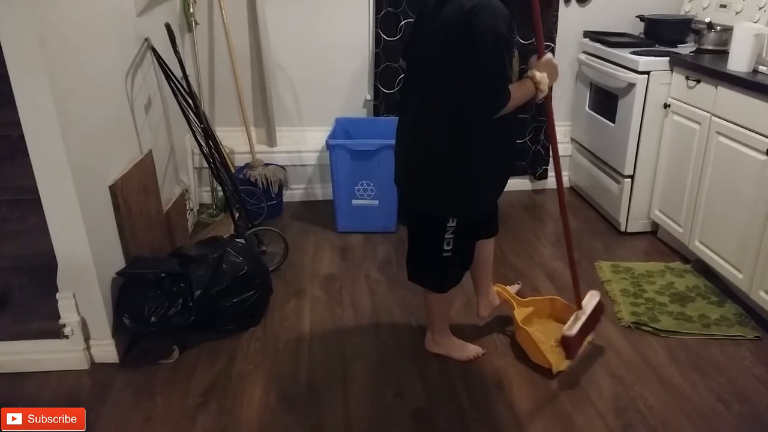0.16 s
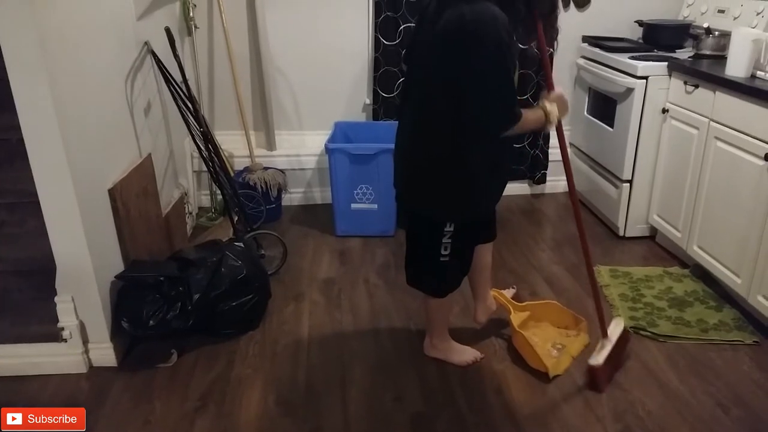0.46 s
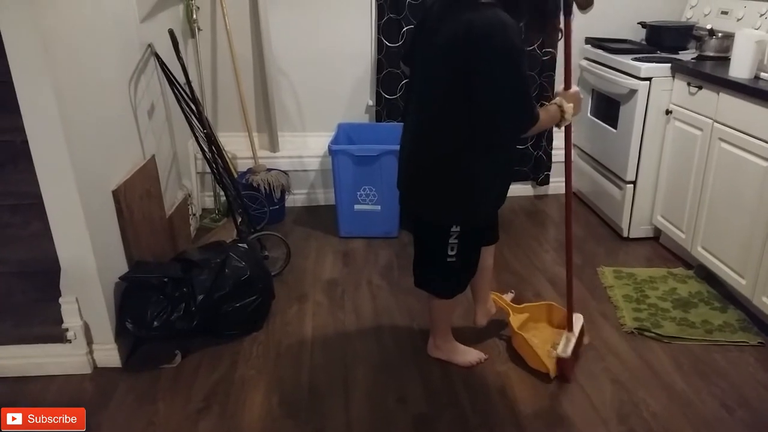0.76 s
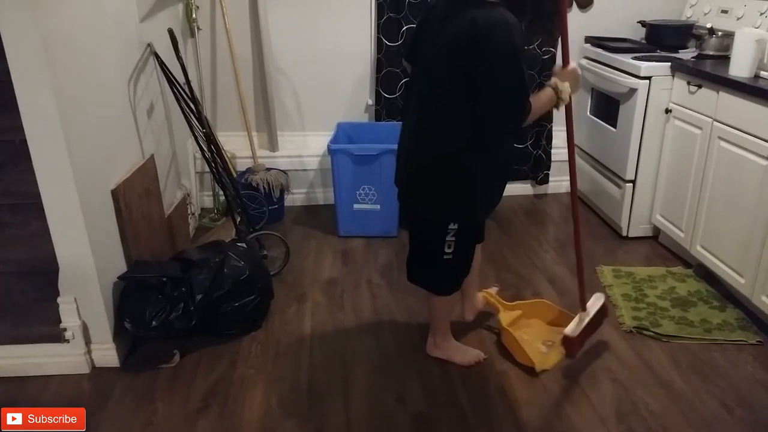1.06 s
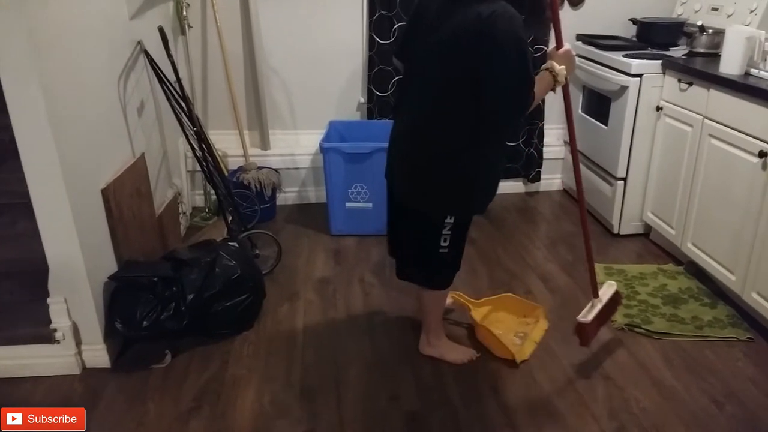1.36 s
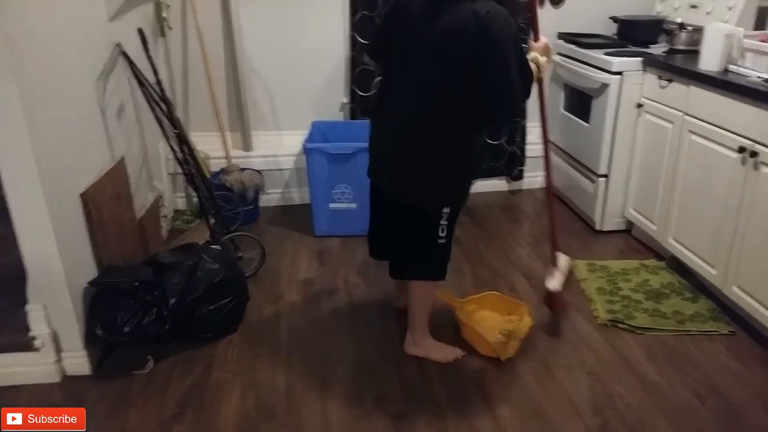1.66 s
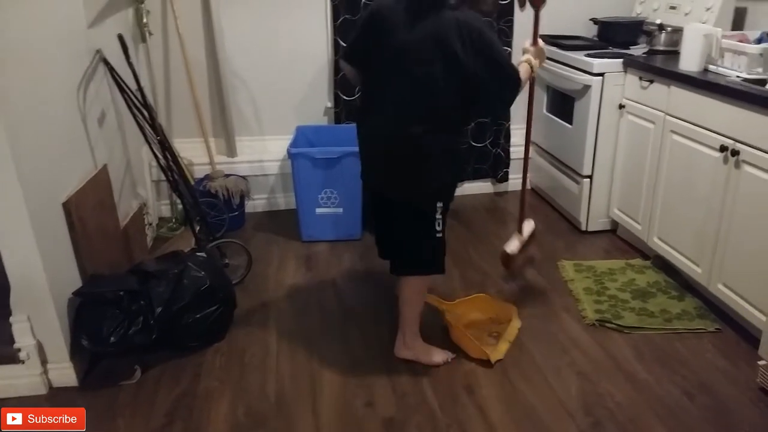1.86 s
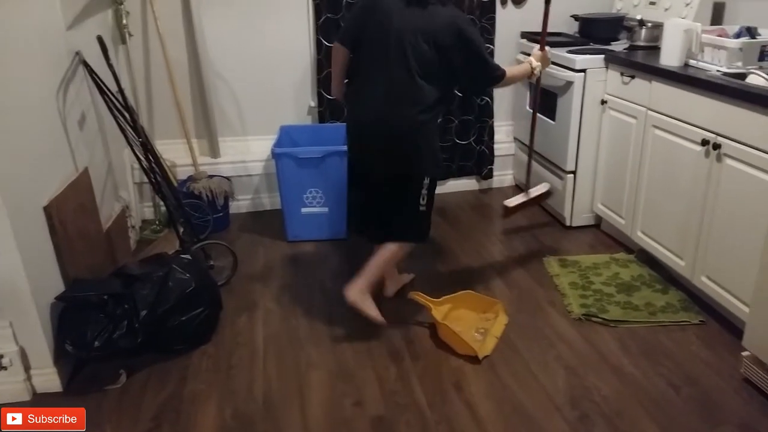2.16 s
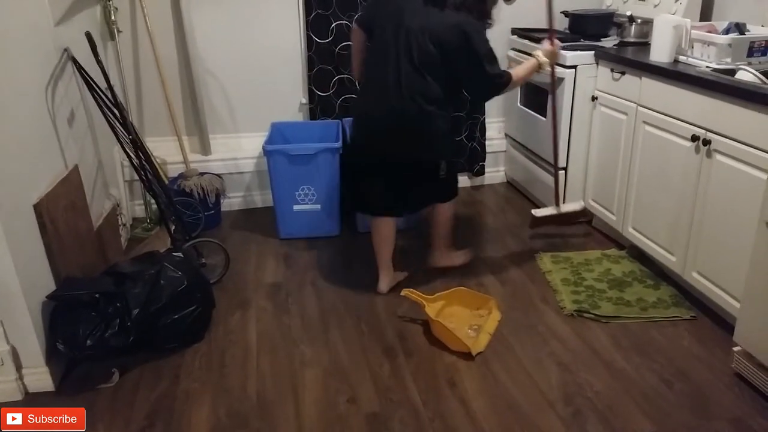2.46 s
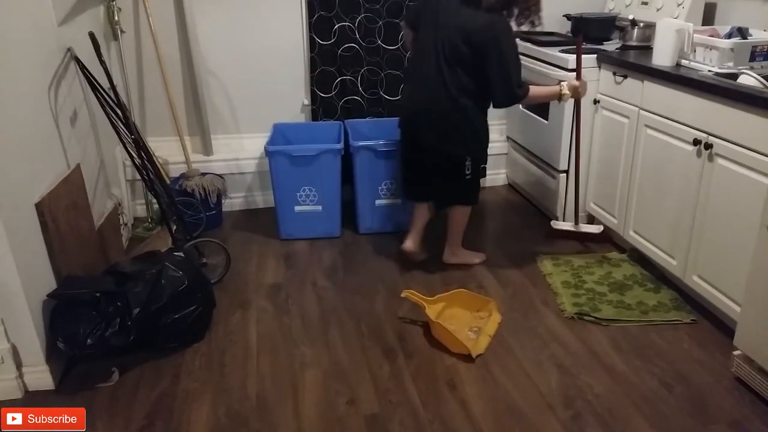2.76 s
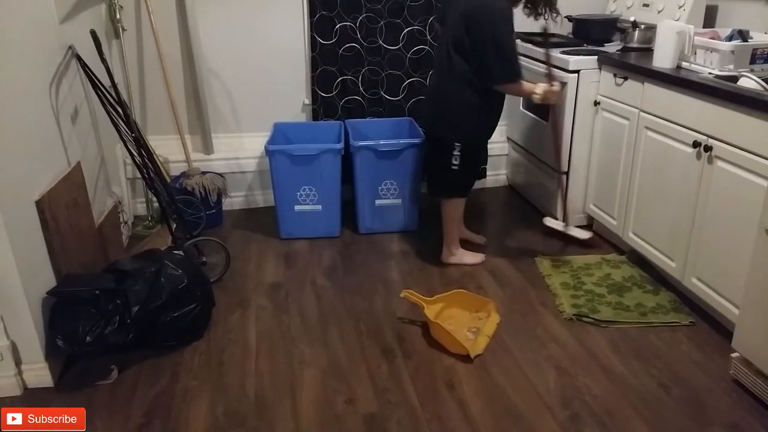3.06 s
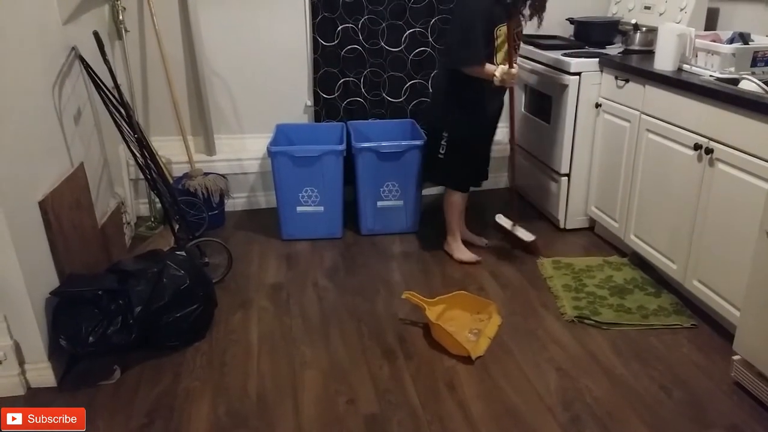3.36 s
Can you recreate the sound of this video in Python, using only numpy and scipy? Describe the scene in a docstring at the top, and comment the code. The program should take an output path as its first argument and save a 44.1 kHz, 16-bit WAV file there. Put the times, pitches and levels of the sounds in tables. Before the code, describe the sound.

Short dry bristle strokes build to a rasp and dull bump on a plastic dustpan; quieter brushing and bare footfalls follow, then a hard woody clack and scraping drag, in a small reflective kitchen, microphone slightly away.

```python
"""A broom sweeps a hard kitchen floor. Bristles stick and flick in short strokes, with a few snaps and rasps.
Partway through, the broom bumps the hollow plastic dustpan, which rocks; then bare feet pad by.
Later the broom head knocks hard down beside the stove, then drags away with a brief squeak near the end.
Scraping is made of random clicks, ringing of fading sine waves, and echoes of fading noise.
Room noise and a thin whine run throughout."""
import sys
import numpy as np
from scipy import signal
from scipy.fft import rfft, irfft, next_fast_len
from scipy.io import wavfile

SR = 44100
rng = np.random.default_rng(int(sys.argv[2]) if len(sys.argv) > 2 else 0)


def dump_mix(stems):
    """Bounce the given channels to the path in sys.argv[1] as a 16-bit WAV at rate SR."""
    frames = np.atleast_2d(stems).T  # one column per channel
    limited = np.clip(frames, -1, 1)  # hard clip at full scale
    pcm = np.round(limited * 32767).astype(np.int16)
    wavfile.write(sys.argv[1], SR, pcm)


N = 154350  # length in samples: 3.5 s

# Source levels are set before the room and the microphone ports. Spectra give only a shape:
# the filter evens out their overall level. A dieaway_s is the time to fade by 60 dB.

# Short broom strokes: start_s, rise_s, hold_s, release_s, hiss_db, hollow_db, tips_db
STROKES = [(-.03, 0.014, 0.15, 0.11, -54.5, -58.5, -54.5), (0.073, 0.017, 0.027, 0.12, -77, -49.5, -77),
           (0.283, 0.02, 0.05, 0.07, -68, -58.5, -90), (0.557, 0.0071, 0.021, 0.038, -53, -58, -84),
           (0.711, 0.028, 0.11, 0.044, -57.5, -53.5, -89), (0.817, 0.039, 0.025, 0.097, -51, -43.5, -63),
           (1.004, 0.053, 0.075, .04, -52, -49, -77), (1.128, 0.025, 0.021, 0.039, -49.5, -38.5, -80),
           (1.187, 0.055, 0.07, 0.074, -42.5, -36.5, -79), (1.271, 0.016, 0.041, 0.065, -42.5, -41, -55),
           (1.327, .03, 0.067, 0.044, -47.5, -63, -55), (1.819, 0.0027, 0.0052, 0.016, -61.5, -79, -70),
           (1.863, 0.026, 0.046, 0.17, -56, -64.5, -88), (1.968, 0.092, 0.11, 0.049, -52.5, -58, -65),
           (2.256, 0.059, 0.079, 0.043, -61.5, -74, -62.5), (2.352, 0.024, 0.064, 0.1, -73, -69, -52.5),
           (2.456, 0.042, 0.019, 0.053, -57, -56.5, -66), (2.579, 0.0086, 0.03, 0.09, -52, -84, -58),
           (2.627, 0.018, 0.016, 0.28, -59, -61, -84)]
# Bristles raking over the dustpan lip: centre_s, length_s (from centre to 37 %), level_db
RAKES = [(.878, 0.036, -51), (1.153, 0.025, -41), (1.189, 0.0088, -46.5), (1.245, .025, -53),
         (1.286, 0.019, -37.5)]
# Pressure and flicking along the long drag: time_s, pressure_db, tips_db
DRAG_PATH = [(3.018, -8, -82), (3.048, -6.5, -74), (3.133, -4, -68), (3.175, 1, -56), (3.24, 0, -60),
             (3.295, -3, -69), (3.345, -4, -53), (3.42, -15.5, -80), (3.49, -24, -90)]
# Resonances of the broom head and handle: pitch_hz, width_hz, relative_level_db
BROOM_RESONANCES = [(1700, 150, -0.5), (2520, 69, 2.5), (2930, 190, -22), (3440, 130, 6.5), (4250, 160, -6),
                    (4250, 130, -4), (4870, 190, -5)]
# Contacts of the broom head as it lands and rocks: start_s, thud_db, crack_db, ring_db
KNOCKS = [(2.7479, 10, 3.5, -4), (2.7526, 13.5, 9, -3.5), (2.767, 12.5, 2, -5), (2.789, 8, -3, -9.5),
          (2.808, -1, -18, -9)]
# Pitches that ring in the broom, floor and stove panel: pitch_hz
KNOCK_HZ = [145, 356, 391, 428, 472, 858, 998, 1195, 1246, 1551, 1697, 1953]
# Ringing of each of those pitches, in the same order: level_db, dieaway_s
KNOCK_MODES = [(-35.5, 0.73), (-23.5, 0.48), (-25, 0.48), (-23.5, 0.31), (-24, 0.34), (-27.5, 0.28),
               (-21.5, 0.35), (-20.5, 0.25), (-29.5, 0.47), (-10, 0.084), (-21, 0.21), (-20.5, 0.23)]
# The broom bumps the dustpan, which rocks: start_s, thump_db, ring_db
BUMPS = [(1.277, -23, -9), (1.283, -21.5, -4.5), (1.35, -28.5, -0.5), (1.389, -32.5, -2.5),
         (1.445, -39.5, -7)]
# Pitches that ring in the dustpan: pitch_hz
PAN_HZ = [178, 250, 319, 357, 858, 893, 960]
# Ringing of each dustpan pitch, in the same order: level_db, dieaway_s
PAN_MODES = [(-37.5, 0.45), (-45.5, 0.73), (-42, 0.19), (-43.5, 0.23), (-40, 0.27), (-45.5, 0.19),
             (-44, 0.16)]
# Single bristles or grit snapping: start_s, level_db
SNAPS = [(0.018, -42), (0.085, -40), (1.508, -45), (1.818, -49.5), (2.384, -41), (3.17, -37.5)]
# Bare footfalls: start_s, level_db
STEPS = [(1.963, -45), (2.002, -46.5), (2.489, -43.5)]

# Spectrum of the bristle hiss: pitch_hz, level_db
HISS_SPECTRUM = [(200, -18), (600, -1), (1500, -3), (2800, 3), (4300, -3), (5900, -8.5), (7200, -20),
                 (9500, -39.5), (15000, -43)]
# Spectrum of the hollow scrape of floor and dustpan: pitch_hz, level_db
HOLLOW_SPECTRUM = [(120, -21.5), (400, -11.5), (660, -13), (830, 1.5), (1000, 0.5), (1220, -4),
                   (1500, -13.5), (2500, -17), (6000, -50)]
# Spectrum of the flicking bristle tips: pitch_hz, level_db
TIPS_SPECTRUM = [(1500, 1.5), (3500, 6.5), (5500, 6), (7500, -6.5), (10000, -12.5), (15000, -18.5)]
# Spectrum of the rasp on the dustpan lip: pitch_hz, level_db
RAKE_SPECTRUM = [(400, -17), (800, -3), (1220, 1.5), (1550, -3.5), (1950, -8), (2550, -7), (6000, -22.5),
                 (10000, -54)]
# Spectrum of the low rub under firm pressure: pitch_hz, level_db
RUB_SPECTRUM = [(70, -40), (160, -5.5), (250, 3.5), (400, -6), (660, -24), (1100, -9), (1700, -7.5),
                (3000, -41)]
# Spectrum of the knock's low thud: pitch_hz, level_db
THUD_SPECTRUM = [(25, -40), (50, -14), (95, -6.5), (165, -13.5), (210, -5), (350, -3), (470, 4),
                 (560, -7.5), (760, -14.5), (890, -2.5), (1220, -3), (1360, -18), (1600, -6), (2000, -4.5),
                 (2500, -17.5), (6000, -66), (12000, -82)]
# Spectrum of the knock's sharp crack: pitch_hz, level_db
CRACK_SPECTRUM = [(300, -20), (1000, -7), (1800, -4), (2400, -4), (3100, -5), (3700, -3), (4500, -13),
                  (5900, -18.5), (7000, -33), (9000, -45), (15000, -77)]
# Spectrum of the thump on the dustpan: pitch_hz, level_db
BUMP_SPECTRUM = [(30, -36), (100, -9.5), (165, -2), (250, 0), (480, -1), (620, -17), (950, -10),
                 (1500, -22), (9000, -59)]
# Spectrum of a snapping bristle: pitch_hz, level_db
SNAP_SPECTRUM = [(1500, -11.5), (3000, -7), (5500, 5.5), (7200, -4.5), (9000, -14.5), (15000, -22.5)]
# Spectrum of a bare footfall: pitch_hz, level_db
FOOT_SPECTRUM = [(30, -25), (90, -15), (170, -8), (270, -1), (450, -6), (800, -19.5), (3000, -57)]
# Spectrum of the steady room noise: pitch_hz, level_db
AIR_SPECTRUM = [(22, -45), (38, -5.5), (70, 0), (130, -4), (260, -5), (450, -9), (700, -17.5),
                (1000, -11.5), (1500, -17.5), (4000, -26.5), (8000, -38), (15500, -40)]

# How long the kitchen echoes in each band: pitch_hz, dieaway_s
ROOM_DIEAWAY = [(100, 0.45), (350, 0.38), (1000, 0.43), (3000, 0.39), (6000, 0.46), (9000, 0.74),
                (14000, 0.37)]
# How alike the two channels are: pitch_hz, likeness (0 to 1)
LIKENESS = [(60, 0.89), (250, 0.83), (500, 0.65), (1000, 0.17), (2000, 0.033), (8000, 0.027)]
# Colour difference of the two microphone ports: pitch_hz, left_minus_right_db
PORTS = [(700, 0), (1300, -0.5), (1800, -3), (2500, -5), (3900, -8), (4700, -5), (5700, 7), (7500, 3.5),
         (10000, 0.5), (15000, 6.5)]

FLICKS_PER_S, TIP_FLICKS_PER_S, RAKE_FLICKS_PER_S = 6000, 2400, 900  # average rates
TIP_SPREAD_DB = 4  # unevenness of the flicks
JUDDER_DB, JUDDER_HZ = 3.5, 69.74  # size of the random wavering, and new values per second
DRAG_HISS_DB, DRAG_RING_DB, DRAG_RUB_DB = -43.5, -47.5, -46  # at 0 dB pressure
RUB_POWER = 1.4  # the low rub needs firm pressure
SQUEAK_S, SQUEAK_LENGTH_S, SQUEAK_HZ, SQUEAK_WIDTH_HZ, SQUEAK_DB = 3.4, 0.018, 3420, 110, -49.5
BUMP_DIEAWAY_S, SNAP_DIEAWAY_S, STEP_DIEAWAY_S = 0.035, 0.023, 0.14
MODE_SCATTER = 0.0074  # largest share by which a ringing pitch shifts from contact to contact
SPOT_S = 0.13  # time in which the moving broom meets a new pattern of reflections
DIRECT_DB, KNOCK_DIRECT_DB = -6.5, -10.5  # gain of the sound that arrives without reflection
EARLY_DB, EARLY_DIEAWAY_S = 3, 0.026  # extra strength at the start of the reflections
AIR_DB, WHINE_DB, WHINE_HZ = -56, -70.5, 15660
TOP_HZ = 15800  # the treble is cut above this


def strokes(t):
    """Short strokes: bristles hiss, floor and dustpan sound hollow under them, the tips crackle."""
    hiss, hollow, tips = np.zeros((3, N))
    for start, rise, hold, release, hiss_db, hollow_db, tips_db in STROKES:
        pressing = np.clip((t - start) / rise, 0, 1)
        lifting = np.clip(1 - (t - start - rise - hold) / release, 0, 1)
        press = pressing * lifting
        # overlapping strokes add in power
        hiss = np.hypot(hiss, press * undb(hiss_db))
        hollow = np.hypot(hollow, press * undb(hollow_db))
        tips = np.hypot(tips, press * undb(tips_db))
    hiss_sound = colour(hiss * flicks(FLICKS_PER_S, spread_db=-0.5), HISS_SPECTRUM)
    hollow_sound = colour(hollow * flicks(FLICKS_PER_S, spread_db=-0.5), HOLLOW_SPECTRUM)
    tips_sound = colour(tips * flicks(TIP_FLICKS_PER_S, TIP_SPREAD_DB), TIPS_SPECTRUM)
    return hiss_sound + hollow_sound + tips_sound


def drag(t):
    """A long stroke: the broom rings, firm pressure brings out a low rub, and the tips flick in two waves."""
    times, press_db, tips_db = np.array(DRAG_PATH).T
    press = undb(np.interp(t, times, press_db, left=-200))
    flicking = undb(np.interp(t, times, tips_db, left=-200))
    grain = flicks(FLICKS_PER_S, spread_db=5)
    body = 0
    for hz, width, db in BROOM_RESONANCES:
        resonator = signal.iirpeak(hz, hz / width, SR)
        body = body + undb(db) * signal.lfilter(*resonator, grain)
    hiss = press * undb(DRAG_HISS_DB) * colour(flicks(FLICKS_PER_S, spread_db=6), HISS_SPECTRUM)
    broom_ring = press * undb(DRAG_RING_DB) * unit(body)
    tips = flicking * colour(flicks(TIP_FLICKS_PER_S, TIP_SPREAD_DB), TIPS_SPECTRUM)
    rub = press ** RUB_POWER * undb(DRAG_RUB_DB) * colour(grain, RUB_SPECTRUM)
    return hiss + broom_ring + tips + rub


def squeak(t):
    """Bristles stick and slip for a moment, heard as a narrow band of noise late in the drag."""
    grip = np.exp(-((t - SQUEAK_S) / SQUEAK_LENGTH_S) ** 2)
    resonator = signal.iirpeak(SQUEAK_HZ, SQUEAK_HZ / SQUEAK_WIDTH_HZ, SR)
    tone = signal.lfilter(*resonator, flicks(FLICKS_PER_S, TIP_SPREAD_DB))
    return undb(SQUEAK_DB) * grip * unit(tone)


def rakes(t):
    """Bunches of stiff bristles catch on the dustpan and let go in a coarse rasp."""
    press = sum(undb(db) * np.exp(-((t - centre) / length) ** 2) for centre, length, db in RAKES)
    return colour(press * flicks(RAKE_FLICKS_PER_S, spread_db=0), RAKE_SPECTRUM)


def flicks(rate, spread_db):
    """Random bristle releases of uneven size; the strong ones bunch as the broom judders."""
    happens = rng.random(N) < rate / SR
    direction = rng.choice([-1, 1], N)
    size = undb(spread_db * rng.standard_normal(N))
    knots = rng.standard_normal(N)
    judder = np.interp(np.arange(N) / SR * JUDDER_HZ, np.arange(N), knots)
    return unit(happens * direction * size * undb(JUDDER_DB * judder))


def knock(t):
    """The broom head lands on one end, slaps down and rocks; each contact has its own reflections."""
    thud, crack = np.zeros((2, 2, N))
    for start, thud_db, crack_db, _ in KNOCKS:
        push = signal.unit_impulse(len(t), int(start * SR))
        thud = thud + undb(thud_db) * kitchen(push, KNOCK_DIRECT_DB)
        crack = crack + undb(crack_db) * kitchen(push, KNOCK_DIRECT_DB)
    return colour(thud, THUD_SPECTRUM) + colour(crack, CRACK_SPECTRUM)


def knock_ring(t):
    """The knock sets the broom, floor and stove panel ringing."""
    return ring(t, np.array(KNOCKS)[:, [0, 3]], KNOCK_HZ, KNOCK_MODES, build_s=0.0041)


def dustpan_bumps(t):
    """The dull thumps of the broom against the dustpan, as fading noise."""
    return blows(t, np.array(BUMPS)[:, :2], BUMP_DIEAWAY_S, BUMP_SPECTRUM)


def dustpan_ring(t):
    """The bumps set the hollow plastic dustpan ringing."""
    return ring(t, np.array(BUMPS)[:, [0, 2]], PAN_HZ, PAN_MODES, build_s=0.004)


def ring(t, contacts, pitches, modes, build_s):
    """Each contact rings the pitches anew, a little detuned, so they beat; each port hears its own phase."""
    out = np.zeros((2, N))
    for start, contact_db in contacts:
        first = int(start * SR)
        age = t[:min(N - first, SR // 2)]  # at most half a second
        chances = rng.uniform(-0.9, 1, (len(modes), 3))
        for hz, (db, dieaway_s), (phase, lag, detune) in zip(pitches, modes, chances):
            unlike = 1 - np.clip(at(LIKENESS, hz), 0, 1)
            apart = lag * unlike / 2 * np.array([[1], [-1]])  # opposite phase shifts, in half turns
            shifted_hz = hz * (1 + MODE_SCATTER * detune)
            wave = np.sin(np.pi * (2 * shifted_hz * age + phase + apart))
            envelope = fade(age, dieaway_s) * (1 - np.exp(-age / build_s))
            out[:, first:first + len(age)] += undb(db + contact_db) * envelope * wave
    return out


def snaps(t):
    """Single bristles or grit let go with short, bright bursts of noise."""
    return blows(t, SNAPS, SNAP_DIEAWAY_S, SNAP_SPECTRUM)


def footsteps(t):
    """Soft bare feet meet the floor with low, fading bursts of noise."""
    return blows(t, STEPS, STEP_DIEAWAY_S, FOOT_SPECTRUM)


def blows(t, rows, dieaway_s, spectrum):
    """Short rough contacts: noise that starts at once and fades, one for each start_s, level_db row."""
    force = sum(undb(db) * fade(t - start, dieaway_s) for start, db in rows)
    return colour(force * rng.choice([-1., 1.], N), spectrum)


def moving(t, x, count=4):
    """The broom travels, so its sound passes around a loop of reflection patterns."""
    out = undb(DIRECT_DB) * x
    for spot in range(count):
        away = np.abs((t / SPOT_S - spot) % count - count / 2)
        share = np.sqrt(np.clip(1 - away, 0, 1))  # crossfade that keeps the power even
        out = out + kitchen(x * share, -np.inf)  # reflections only
    return out


def kitchen(x, direct_db):
    """A direct path, strong early echoes off the cupboards and reflections that die band by band."""
    size = 2 ** 15
    t = np.arange(size) / SR
    hz, noise = diffuse(size)
    tail = 0
    for centre, dieaway_s in ROOM_DIEAWAY:
        # each band blends into its neighbours
        share = at([(f, float(f == centre)) for f, _ in ROOM_DIEAWAY], hz)
        tail = tail + irfft(noise * share, size) * fade(t, dieaway_s)
    early = 1 + undb(EARLY_DB) * fade(t, EARLY_DIEAWAY_S)
    tail = unit(tail * early) / np.sqrt(size)
    reflections = signal.fftconvolve(x[None], tail, axes=1)[:, :N]
    return undb(direct_db) * x + reflections


def background(t):
    """Low steady room noise and a thin electrical whine, weaker on the right."""
    air = colour(irfft(diffuse(N)[1], N), AIR_SPECTRUM)
    whine = np.sin(2 * np.pi * WHINE_HZ * t) * np.array([[1], [0.35]])
    return undb(AIR_DB) * air + undb(WHINE_DB) * whine


def diffuse(size):
    """Spectra of two noises, alike where LIKENESS is high and unrelated where it is low."""
    hz = np.fft.rfftfreq(size, 1 / SR)
    like = np.clip(at(LIKENESS, hz), 0, 1)
    mid, side = rfft(rng.standard_normal((2, size)))
    shared = mid * np.sqrt(1 + like)
    opposite = np.array([[1], [-1]]) * side * np.sqrt(1 - like)
    return hz, (shared + opposite) / np.sqrt(2)


def colour(x, table):
    """Filter x to the given spectrum with unit power gain, reacting only after each sound starts."""
    size = next_fast_len(2 * N)
    gain = unit(undb(at(table, np.fft.rfftfreq(size, 1 / SR))))
    # fold the cepstrum (the spectrum of the log gain) forward in time: a minimum-phase filter
    cepstrum = irfft(np.log(gain), size)
    cepstrum[1:size // 2] *= 2
    cepstrum[size // 2 + 1:] = 0
    response = np.exp(rfft(cepstrum))
    return irfft(rfft(x, size) * response, size)[..., :N]


def fade(t, dieaway_s):
    """Exponential decay that starts at t = 0 and falls 60 dB in dieaway_s."""
    return (t >= 0) * np.exp(-np.log(1000) * np.maximum(t, 0) / max(dieaway_s, 1e-3))


def at(table, hz):
    """Read a table between its rows on a log-frequency axis."""
    f, v = np.array(table, float).T
    return np.interp(np.log(np.maximum(hz, 1)), np.log(f), v)


def unit(x):
    """Scale to an rms (average strength) of 1."""
    return x / np.sqrt(np.mean(x ** 2) + 1e-20)


def undb(db):
    """Turn decibels into a gain factor."""
    return 10 ** (np.asarray(db) / 20)


def scene():
    """Mix sweeping, knocks and footfalls with the kitchen and its background."""
    t = np.arange(N) / SR
    sweeping = strokes(t) + rakes(t) + drag(t) + squeak(t)
    contacts = dustpan_bumps(t) + snaps(t) + footsteps(t)
    rings = knock_ring(t) + dustpan_ring(t)
    in_room = moving(t, sweeping + contacts)
    return in_room + knock(t) + rings + background(t)


def record(dry):
    """Each microphone port adds its own colour; the top is cut."""
    size = next_fast_len(2 * N)
    lean_db = at(PORTS, np.fft.rfftfreq(size, 1 / SR))
    port_gain = undb(np.array([lean_db, -lean_db]) / 2)
    heard = irfft(rfft(dry, size) * port_gain, size)[:, :N]
    top_cut = signal.ellip(10, 0.2, 80, TOP_HZ, fs=SR, output="sos")
    return signal.sosfilt(top_cut, heard)


dry = scene()
out = record(dry)
dump_mix(out)
```